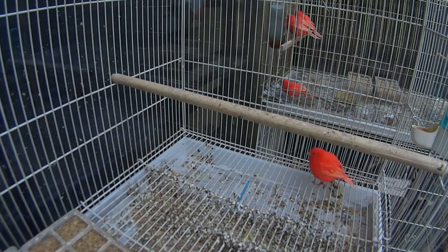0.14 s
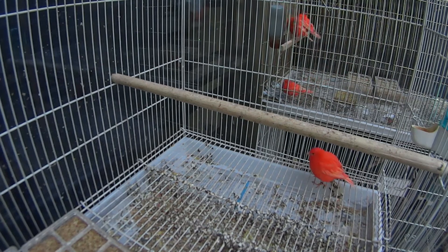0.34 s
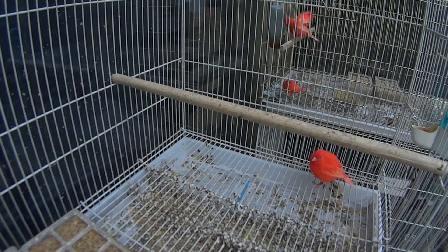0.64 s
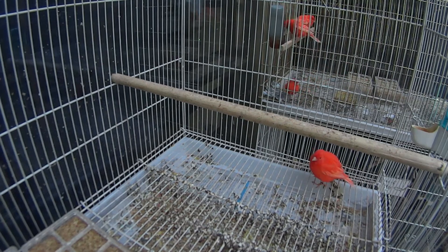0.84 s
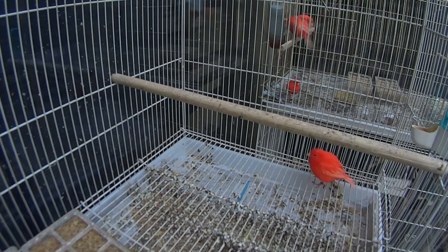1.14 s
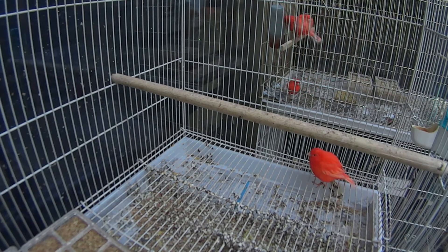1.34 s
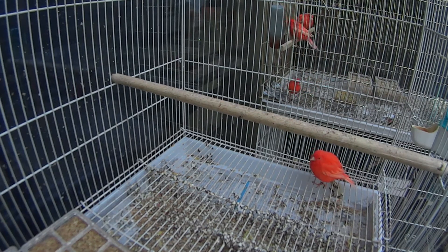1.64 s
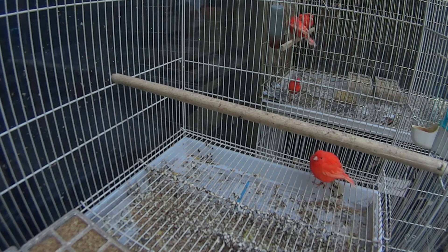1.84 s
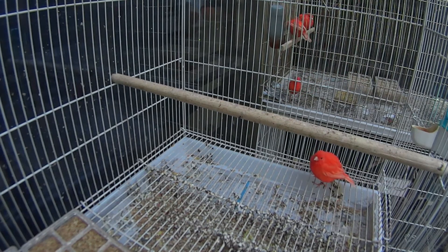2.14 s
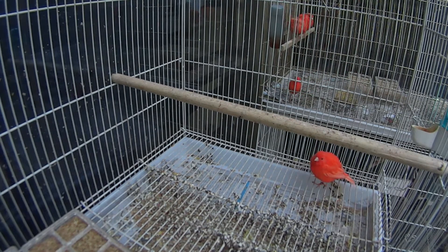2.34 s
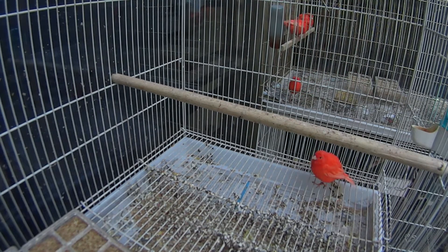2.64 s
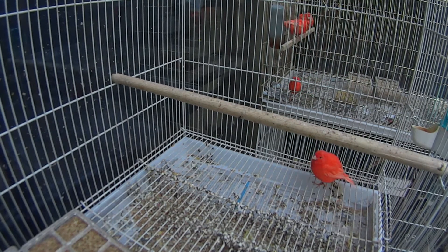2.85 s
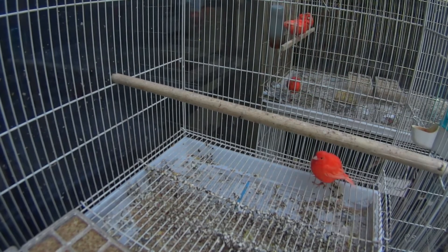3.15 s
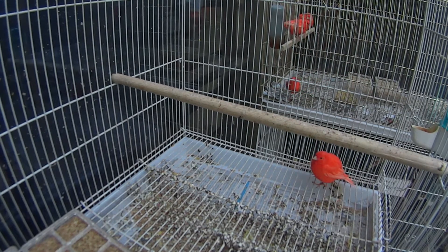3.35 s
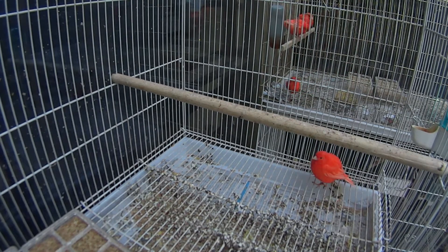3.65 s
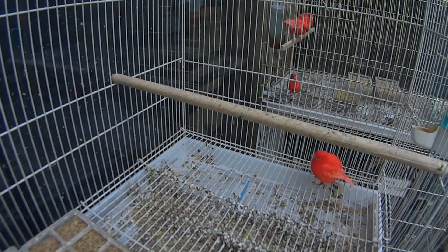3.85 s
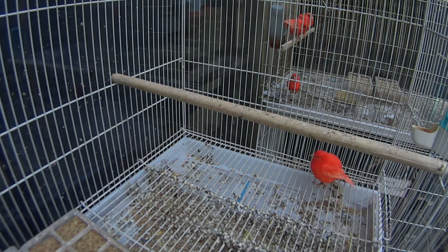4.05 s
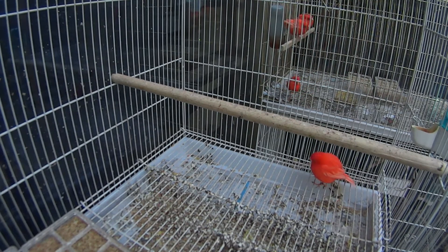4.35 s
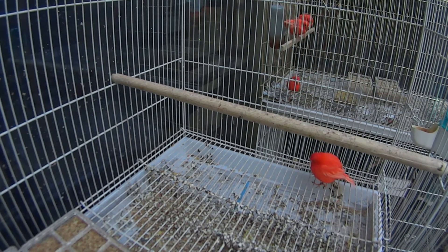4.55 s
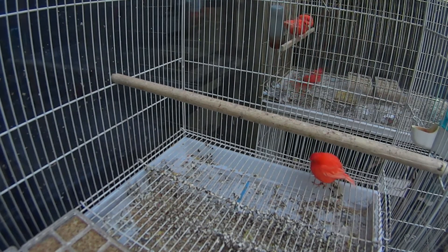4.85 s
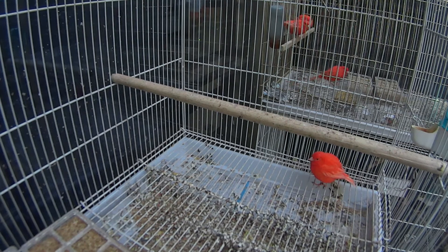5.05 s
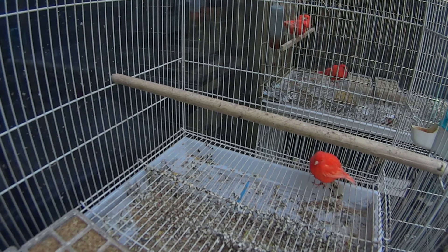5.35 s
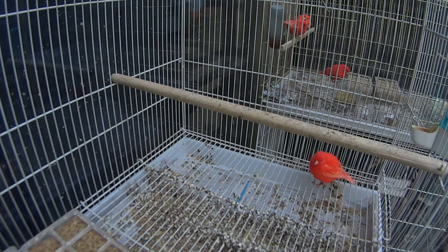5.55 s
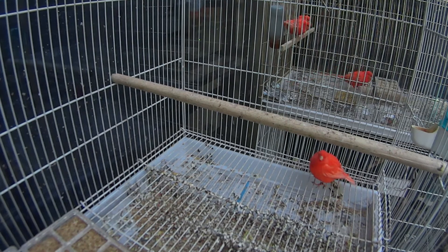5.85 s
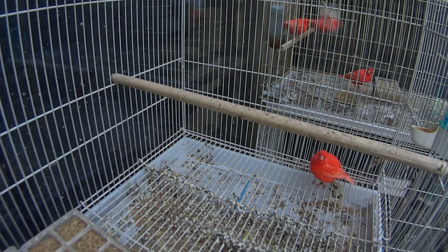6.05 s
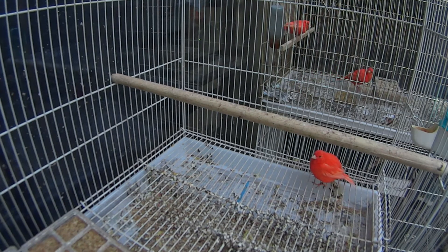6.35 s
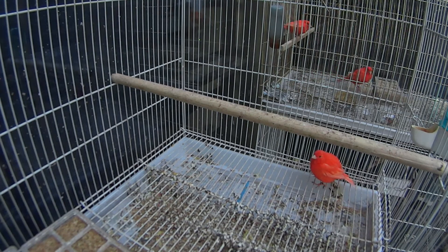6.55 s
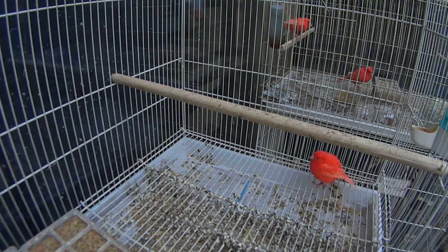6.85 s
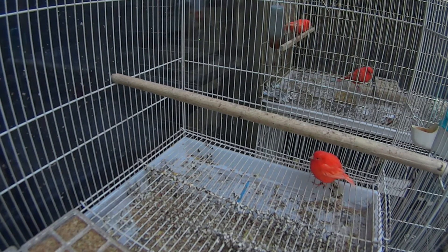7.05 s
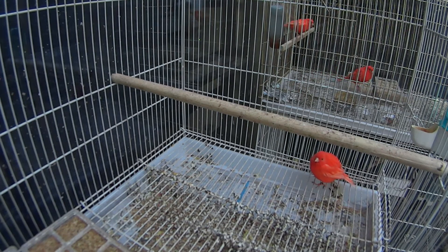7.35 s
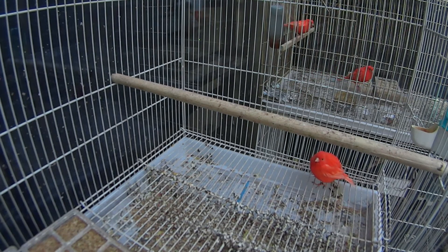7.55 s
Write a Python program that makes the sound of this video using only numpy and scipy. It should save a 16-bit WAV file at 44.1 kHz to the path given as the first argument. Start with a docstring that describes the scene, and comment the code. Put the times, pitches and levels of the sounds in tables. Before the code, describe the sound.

Caged canaries sing rapid rolls, chipping trills and bright falling whistles in a hard-walled room, with light wire ticks, faint wing flutters and low rumble.

```python
"""A hard-walled room with wire cages, where canaries sing. Slurs, peeps and rising calls are gliding sine notes with
overtones; rolls and trills repeat quick sweeps and chips, the rolls heard mostly by way of the walls.
Filtered noise and decaying tones make ticks on the bars, and noise swelling in beats makes wing flutters.
Faint blurred chatter lies behind, over a low rumble and a narrow hum that swell and fade together."""
import sys
import numpy as np
from scipy import signal
from scipy.fft import rfft, irfft
from scipy.io import wavfile
from scipy.ndimage import map_coordinates

SR = 44100
rng = np.random.default_rng(int(sys.argv[2]) if len(sys.argv) > 2 else 0)


def transcribe(signal):
    """Save signal, clipped to [-1, 1], as a 16-bit WAV file at the path in sys.argv[1]."""
    frames = np.atleast_2d(signal).T
    limited = np.clip(frames, -1, 1)
    pcm = np.round(limited * 32767).astype(np.int16)
    wavfile.write(sys.argv[1], SR, pcm)


N = 340011
T = np.arange(N) / SR


def undb(db):
    """Decibels to gain."""
    return 10 ** (np.asarray(db) / 20)


def add(track, s, sound):
    """Mix a sound into a track at time s."""
    i = max(int(s * SR), 0)
    track[i:i + len(sound)] += sound[:max(N - i, 0)]


def over_time(points):
    """Join (seconds, value) points by straight lines over the whole scene."""
    return np.interp(T, *np.transpose(points))


def on_log_axis(hz, points):
    """Read (Hz, value) points at the given frequencies."""
    point_hz, value = np.transpose(points)
    return np.interp(np.log(hz + 1), np.log(point_hz), value)


def noise(points):
    """Noise of rms 1 with a spectrum of (Hz, dB) points."""
    spectrum = rfft(rng.standard_normal(N))
    gain = undb(on_log_axis(np.fft.rfftfreq(N, 1 / SR), points))
    x = irfft(spectrum * gain, N)
    return x / x.std()


def walk(rate, size):
    """Smooth random wander of spread near 1, through `rate` random knots a second."""
    knots = rng.standard_normal(1024)
    return map_coordinates(knots, [np.arange(size) * rate / SR], order=3, mode="wrap")


def syrinx(length, pitches, waver, edge):
    """One note: progress 0-1, the phase of a smooth, slightly unsteady glide, and its soft-edged envelope."""
    u = np.linspace(0, 1, int(length * SR))
    hz = map_coordinates(np.array(pitches, float), [u * (len(pitches) - 1)], order=2, mode="nearest")
    unsteady_hz = hz * (1 + waver * walk(504.7, len(u)))
    phase = 2 * np.pi * np.cumsum(unsteady_hz) / SR
    gate = np.sin(np.pi / 2 * np.clip(np.minimum(u, 1 - u) / edge, 0, 1)) ** 2
    return u, phase, np.sqrt(2) * gate


def rasp(x, db):
    """Quick irregular flutter of the membranes spreads a skirt of noise around each note."""
    return x * (1 + undb(db) * noise([(20, 3.0), (900, 7), (2200, -13), (4000, -13.0), (8000, -71)]))


def phrase(first_s, last_s, count, slowing, db, swell_db, first_hz, last_hz):
    """Syllables as (s, dB, Hz): evenly timed, slowing or quickening, as level and pitch drift through the phrase."""
    scatter_db, scatter_pitch = 1.5, 0.0257  # spread from syllable to syllable: dB, share of pitch
    u = np.linspace(0, 1, count)
    times = first_s + (last_s - first_s) * (u - slowing * u * (1 - u))
    loud, high = rng.standard_normal((count, 2)).T
    levels = db + swell_db * (u - .5) + scatter_db * loud
    pitches = (first_hz + (last_hz - first_hz) * u) * (1 + scatter_pitch * high)
    return zip(times, levels, pitches)


def room(x, direct_db, echo_db, early_db, width):
    """Direct sound, separate slaps from trays and near walls, then a dense tail; the two close ports hear much the same."""
    # Time the tail takes to fall by 60 dB, shorter in the treble. Each row: frequency in Hz, time in seconds.
    t60_points = [(1000, 0.63), (3000, 0.46), (6000, 0.32), (11000, 0.12)]
    slaps_per_s = 500
    t = T[:2 * SR // 3]
    hits = rng.random((len(t))) < slaps_per_s / SR
    slaps = rng.standard_normal((2, len(t))) * hits * np.sqrt(SR / slaps_per_s)
    hz, frame_s, cells = signal.stft(rng.standard_normal((2, len(t))), SR, nperseg=256)
    decay_db = -60 * frame_s / on_log_axis(hz, t60_points)[:, None]
    tail = signal.istft(cells * undb(decay_db), SR)[1][:, :len(t)]
    tail = tail * np.clip(t / 0.0035, 0, 1) + undb(early_db) * slaps * np.exp(-t / 0.029)
    mid, side = tail / np.sqrt(np.sum(tail ** 2, axis=1, keepdims=True))
    responses = np.array([mid + width * side, mid - width * side])
    echoes = signal.fftconvolve(x[None], responses, axes=1)[:, :N]
    return undb(direct_db) * x + undb(echo_db) * echoes


def background():
    """Rumble, hiss and a narrow hum shared by both ports, with opposed noise that makes the room air wide."""
    # Colour of the room noise. Each row: frequency in Hz, level in dB.
    air = [(20, -4), (45, 0.5), (65, 6.5), (95, -6), (140, 3), (200, -5.5), (300, -11.5), (600, -15.5),
           (900, -15.5), (1300, -12), (1800, -25), (3000, -24.5), (6000, -17.5), (11000, -26)]
    # Steady part of the rumble, ahead of its low-pass. Each row: time in seconds, level in dB.
    steady_rumble = [(0, -49), (2, -45), (3.5, -50.5), (4.1, -52), (5.6, -50), (7.7, -49)]
    # Swells of rumble and hum. Each row: time of full swell in seconds, hold in seconds,
    # rumble level in dB (ahead of its low-pass), hum level in dB.
    swell_rows = [(0, 0.019, -43, -61), (1.04, 0.16, -41.5, -59.5), (2.467, 0.045, -39, -53),
                  (4.556, .06, -42.5, -57), (6.172, 0.16, -45, -47), (7.037, 0.47, -46, -58)]
    attack_s, release_s = 0.093, 0.15
    hum_hz, hum_floor_db = 425, -70.5  # the floor is the hum between swells

    rumble_gain, hum_gain = undb(over_time(steady_rumble)), undb(hum_floor_db)
    for s, hold, rumble_db, hum_db in swell_rows:
        attack = np.clip(1 + (T - s) / attack_s, 0, 1)
        swell = attack * np.exp(-np.maximum(T - s - hold, 0) / release_s)
        rumble_gain = np.hypot(rumble_gain, undb(rumble_db) * swell)
        hum_gain = np.hypot(hum_gain, undb(hum_db) * swell)

    low_pass = signal.butter(2, 380, fs=SR, output="sos")
    hiss_high_pass = signal.butter(2, 400, "high", fs=SR, output="sos")
    side_high_pass = signal.butter(2, 330, "high", fs=SR, output="sos")
    rumble = signal.sosfilt(low_pass, noise(air)) * rumble_gain
    hiss = signal.sosfilt(hiss_high_pass, noise(air)) * undb(-49)
    # a slow wander of phase gives the hum its narrow width
    hum = hum_gain * np.sqrt(2) * np.sin(2 * np.pi * hum_hz * T + walk(28, N) / 2)
    side = undb(-48.0) * signal.sosfilt(side_high_pass, noise(air)) + undb(-67.5) * noise(air)
    return rumble + hiss + hum + side * np.array([[1], [-1]])


def chatter(count=1800):
    """Birds at the far end of the room: many faint chips of random pitch and slope that the room blurs together."""
    # Loudness of the chatter. Each row: time in seconds, level in dB ahead of the room.
    loudness = [(0, -37.5), (.3, -36.5), (.45, -45.5), (1.25, -31), (1.6, -46.5), (2.1, -47.5), (2.4, -39),
                (3.1, -48), (3.45, -36.5), (3.9, -51.5), (4.55, -40), (4.8, -72), (5.0, -42.5), (5.75, -37),
                (6.25, -45.5), (7.2, -41), (7.5, -38), (7.71, -45.5)]
    # Which pitches stand out. Each row: chip pitch in Hz, relative level in dB.
    colour = [(1200, -17.5), (1800, -16), (2200, -2), (3000, 6.5), (3700, -8.5), (5300, -5), (6000, -74)]
    out = np.zeros(N)
    for k, (when, height, slope) in enumerate(rng.random((count, 3))):
        hz = 1300 + 4300 * height
        sweep = hz * np.array([.88, 1.12]) ** np.sign(slope - .5)  # either sign of the power: up or down
        u, phase, gate = syrinx(0.0147, sweep, waver=0.022, edge=1.0)
        s = (k + when) / count * N / SR
        add(out, s, undb(on_log_axis(hz, colour)) * gate * np.sin(phase))
    return out / out.std() * undb(over_time(loudness))


def whistler(since, until, waver, edge):
    """One bird's turn of slurs and peeps, with a quick tremble in pitch; its throat damps the overtones."""
    # Short arched peeps. Each row: start in seconds, length in seconds, pitch in Hz,
    # glide from start to end in Hz, level in dB, octave in dB relative to the fundamental.
    peep_rows = [ (0.01, 0.052, 4900, 207, -17.5, -42), (0.395, 0.034, 2650, 552, -30, -28),
                 (0.431, 0.036, 3750, 150, -29.5, -33), (0.489, 0.0226, 3540, 350, -23.5, -23),
                 (0.546, 0.067, 2550, 200, -29.5, -6), (0.749, 0.061, 3443, -48, -23.5, -30),
                 (1.087, 0.064, 3560, -720, -14.5, -9), (5.003, 0.041, 2150, -130, -38.5, 8.5),
                 (5.11, 0.048, 2110, -130, -41, 4), (5.302, 0.031, 3070, 106, -21, -33),
                 (5.377, 0.028, 3234, 120, -17, -34), (5.484, 0.036, 3080, -150, -23, -22),
                 (5.755, 0.018, 2710, -600, -29, 5), (5.832, 0.01, 2620, 48, -26, -10),
                 (6.329, 0.033, 3230, -50, -25.5, -8), (6.387, 0.041, 3540, -230, -23.5, -16),
                 (6.405, 0.016, 4150, -460, -25, -17), (6.931, 0.018, 3170, -100, -22, -24),
                 (7.03, 0.016, 3300, -5, -22.5, -26), (7.358, .07, 2747, -800, -33, -20),
                 (7.417, 0.055, 3000, -450, -30, -13)]
    # Falling slurs. Each row: start in seconds, length in seconds, crest pitch in Hz, pitch it falls towards in Hz,
    # place of the crest from 0 to 1, level halfway in dB, swell from start to end in dB.
    slur_rows = [ (1.183, 0.054, 5510, 3800, 0.24, -11.5, -5), (1.297, 0.055, 6080, 4410, 0, -14.5, 14),
                 (1.405, 0.054, 5370, 4606, 0.12, -16, 12), (1.444, 0.019, 4730, 3390, 0.1, -21.5, -20),
                 (2.467, .06, 5845, 4270, .05, -12.5, 0), (2.602, 0.062, 6460, 4730, 0, -11.5, 5.5),
                 (4.128, 0.0205, 5410, 4440, 0.02, -33.5, 0), (6.491, 0.064, 5510, 3955, 0.02, -27.5, 29.5),
                 (6.639, 0.081, 5845, 4050, 0, -25.5, 22.5), (6.793, 0.074, 5410, 3980, 0.07, -22, 17),
                 (6.945, 0.055, 5300, 4008, 0, -24, 35), (7.085, 0.078, 5420, 4082, 0.03, -25, 27),
                 (7.19, 0.073, 5940, 4360, 0, -23.5, 15), (7.275, 0.071, 5250, 4340, 0, -23.5, 6),
                 (7.345, 0.053, 6380, 3894, 0.13, -23, 18), (7.425, 0.062, 5450, 4400, 0, -26.5, -2),
                 (7.512, .053, 5200, 4274, 0, -18.5, -1), (7.581, 0.066, 5230, 4305, 0, -23, 15),
                 (7.675, .057, 5120, 4820, 0, -22, 27)]
    arches = [row for row in peep_rows if since <= row[0] < until]
    falls = [row for row in slur_rows if since <= row[0] < until]
    throat = signal.butter(2, 7500, fs=SR, output="sos")
    return signal.sosfilt(throat, slurs(falls, waver, edge) + peeps(arches, waver, edge))


def peeps(rows, waver, edge):
    """Short notes that arch slightly along a glide."""
    arch_depth = 0.033  # the arch lowers both ends by this share of the pitch
    out = np.zeros(N)
    for s, length, hz, glide_hz, db, octave_db in rows:
        along = np.linspace(-1, 1, 10)
        pitches = hz * (1 - arch_depth * along ** 2) + glide_hz * along / 2
        u, phase, gate = syrinx(length, pitches, waver, edge)
        tone = np.sin(phase) + undb(octave_db) * np.sin(2 * phase)
        add(out, s, gate * undb(db) * tone)
    return out


def roll():
    """Each syllable is a zigzag: a strong upward sweep, then a drop and a second, softer rise."""
    # Rolls of syllables. Each row: first syllable in seconds, last in seconds, number of syllables,
    # slowing from -1 to 1, level in dB (ahead of the stroke levels), swell in dB,
    # pitch setting of the first syllable in Hz, of the last in Hz.
    roll_rows = [ (0.058, 0.186, 4, 0, -24, 1.5, 2830, 3955), (0.233, .283, 2, 0, -18, -2, 3800, 3920),
                 (0.485, 1.074, 14, .12, -20.5, 1, 3475, 3423),
                 (1.204, 1.35, 4, 0.0042, -20.5, -3.5, 3394, 3205),
                 (4.947, 4.985, 2, 0, -32, 5, 2660, 2640), (5.028, 5.413, 10, 0.0039, -23, 5, 2754, 2984),
                 (5.529, 5.664, 4, 0.005, -17.5, -1.5, 3080, 3493),
                 (5.733, 5.84, 3, 0.0013, -16.5, -9.5, 3000, 3050),
                 (5.872, 6.235, 8, 0, -18.5, -3.5, 3515, 3374)]
    out = np.zeros(N)
    for row in roll_rows:
        for s, db, hz in phrase(*row):
            rise = np.array([0.3994 * hz + 1230, .98 * hz, min(1.27 * hz, 4300)])
            # (lag s, pitches Hz, stroke dB)
            strokes = [(-.003, rise, -6.5), (.014, rise[::-1], -13), (.026, .95 * rise, -12.5)]
            for lag, pitches, stroke_db in strokes:
                u, phase, gate = syrinx(0.012, pitches, waver=0.026, edge=0.19)
                tone = np.sin(phase) + undb(-24) * np.sin(2 * phase)
                add(out, s + lag, undb(db + stroke_db) * gate * tone)
    return rasp(out, db=-26.5)


def cage():
    """A claw or beak strikes the wire: a bright crack and a short ring of the bars."""
    # Knocks and ticks. Each row: time in seconds, crack level in dB (ahead of a 1 dB trim), peak of the ring in dB.
    tick_rows = [(0.061, -47, -67), (.338, -24, -32), (0.616, -59, -42), (.733, -48, -57),
                 (1.148, -38.5, -61), (1.673, -55, -46), (4.923, -47, -76), (4.938, -60, -43),
                 (4.996, -48, -54), (5.756, -48, -64), (5.799, -44, -45)]
    # Ringing modes of the bars. Each row: frequency in Hz, relative level in dB, time to fall 60 dB in seconds.
    bar_modes = [(1380, -6, 0.53), (1244, 11, 0.16), (1413, 20.5, 0.034), (1625, -24, 0.057)]
    out, t = np.zeros(N), T[:SR // 3]
    bright = noise([(1000, -44), (3500, 15), (5000, 18.0), (8500, 22.5), (11000, 7.5)])
    ring = sum(undb(mode_db - 60 * t / t60) * np.sin(2 * np.pi * hz * t) for hz, mode_db, t60 in bar_modes)
    ring = ring / np.abs(ring).max()
    for s, db, ring_db in tick_rows:
        # each tick takes its own stretch of noise
        crack = np.roll(bright, rng.integers(N))[:len(t)] * np.exp(-t / 0.0097)
        add(out, s, undb(db - 1) * crack + undb(ring_db) * ring)
    return out


def slurs(rows, waver, edge):
    """Whistles that tip over a crest, fall and level out; most get louder as they fall."""
    fall_share, octave_db = .45, -28  # width of the fall as a share of the slur; octave below the fundamental
    out = np.zeros(N)
    for s, length, top_hz, end_hz, crest, db, swell_db in rows:
        fall = np.exp(-((np.linspace(0, 1, 20) - crest) / fall_share) ** 2)
        u, phase, gate = syrinx(length, end_hz + (top_hz - end_hz) * fall, waver, edge)
        tone = np.sin(phase) + undb(octave_db) * np.sin(2 * phase)
        add(out, s, gate * undb(db + swell_db * (u - .5)) * tone)
    return out


def trill():
    """Each chip opens with a flick up through a wide range, then lingers and sags; louder ones hold longer."""
    # Trills of chips. Each row: first chip in seconds, last in seconds, number of chips, slowing from -1 to 1,
    # level in dB (ahead of the trims on flick and body), swell in dB, first pitch in Hz, last pitch in Hz,
    # opening flick in dB relative to the chip level.
    trill_rows = [ (1.556, 2.429, 17, 0, -25.5, 5.5, 2746, 2923, -2.5),
                  (2.476, 2.792, 8, 0.0026, -20.5, -3, 3010, 2850, -4.5),
                  (2.834, 2.977, 4, 0.0039, -15.5, 1.5, 2857, 2860, -9),
                  (3.032, 3.197, 4, 0.087, -21, -1, 2767, 2942, -11),
                  (3.254, 3.499, 5, -0.075, -16, 4.5, 3020, 3072, -8.5),
                  (3.773, 3.938, 3, 0.0039, -18.5, -5, 2664, 2616, -24),
                  (4.02, 4.382, 5, 0, -18, 1.5, 2720, 2522, -7.5),
                  (6.497, 6.64, 3, -0.0059, -23.5, 0, 3150, 3010, -28),
                  (7.141, 7.665, 9, -0.00053, -25.5, -0.5, 3107, 2470, -18)]
    out = np.zeros(N)
    for *row, flick_db in trill_rows:
        for s, db, hz in phrase(*row):
            flick = [1700, 2300, 0.95 * hz, 1.005 * hz, 5500]
            u, phase, gate = syrinx(0.0074, flick, waver=0.048, edge=0.3)
            add(out, s, undb(db - 2.5 + flick_db) * gate * np.sin(phase))

            length = np.clip(0.0168 + 0.0003 * (db + 23.5), .008, .03)
            sag = hz * np.array([1.09, 1.02, .99, 0.886])
            u, phase, gate = syrinx(length, sag, waver=0.023, edge=0.14)
            tone = np.sin(phase) + undb(-28.0) * np.sin(2 * phase)
            add(out, s + 0.00199, undb(db - 8) * gate * tone)
    return rasp(out, db=-16.5)


def wings():
    """Feathers brush the air in a short swell of beats."""
    # Flutters. Each row: start in seconds, length in seconds, level at the middle in dB, ahead of the beats.
    flutter_rows = [(2.235, 0.1, -47.5), (2.83, 0.22, -42.5), (4.125, 0.072, -52), (5.367, 0.08, -46),
                    (5.711, 0.083, -38), (7.247, 0.45, -50.5)]
    # Colour of the feather noise. Each row: frequency in Hz, level in dB.
    feather_colour = [(1500, -31.5), (3000, 5), (5000, 11.5), (7000, 1.5), (11000, -12)]
    swell = np.zeros(N)
    for s, length, db in flutter_rows:
        add(swell, s, undb(db) * np.hanning(int(length * SR)))
    beats = undb(3.5 * np.sin(2 * np.pi * 24 * T))  # 24 beats a second, 3.5 dB up and down
    return swell * noise(feather_colour) * beats


def calls():
    """Calls with the beak open rise towards a top pitch: a strong octave joins the fundamental, with weak overtones."""
    # Drawn-out rising calls. Each row: start in seconds, length in seconds, top pitch in Hz, rise time in seconds,
    # fundamental halfway in dB, its swell in dB, octave halfway in dB, its swell in dB.
    call_rows = [ (2.262, 0.093, 2520, .11, -48, 28, -31, 4),
                 (3.527, 0.036, 2310, 0.067, -39.5, 24, -21, 3),
                 (3.565, 0.168, 2886, .05, -18.5, 10.5, -25, -23.5),
                 (4.448, 0.14, 2835, 0.046, -30, -8, -30, -5),
                 (4.466, 0.206, 2157, 0.11, -40.5, 12, -38, -3),
                 (4.542, 0.072, 2804, 0.024, -37, 45, -34, -9),
                 (5.304, 0.062, 2456, 0.022, -56, -3, -29.5, 0),
                 (5.506, 0.096, 2864, 0.052, -33, -5, -26, 2.5), (6.70, 0.23, 2755, .17, -29, 3.5, -29, 0)]
    start_share, sag_hz_per_s = .72, 1346  # starting share of the top pitch; fall of pitch after the rise
    out = np.zeros(N)
    for s, length, top_hz, rise_s, db, swell_db, octave_db, octave_swell_db in call_rows:
        t = np.linspace(0, length, 20)
        rise = np.sin(np.pi / 2 * np.minimum(t / rise_s, 1))
        sag_hz = sag_hz_per_s * np.maximum(t - rise_s, 0)
        pitches = top_hz * (start_share + (1 - start_share) * rise) - sag_hz
        u, phase, gate = syrinx(length, pitches, waver=0.018, edge=0.078)
        low = undb(db + swell_db * (u - .5)) * np.sin(phase)
        upper = np.sin(2 * phase) + undb(-19.0) * np.sin(3 * phase) + undb(-31.5) * np.sin(4 * phase)
        add(out, s, gate * (low + undb(octave_db + octave_swell_db * (u - .5)) * upper))
    return out


def scene():
    """The first slurs come from a near perch, the later ones from further back; the rolls arrive by way of the walls."""
    # How squarely the near bird faces the microphone. Each row: time in seconds, direct sound in dB.
    facing = [(0, -4.5), (1.1, -6), (1.45, -0.5), (2.5, -9.5)]
    second_bird_s = 4
    first = whistler(0, second_bird_s, waver=0.018, edge=0.16)
    second = whistler(second_bird_s, N / SR, waver=0.0308, edge=0.12)
    near = room(rasp(first, db=-22.0), direct_db=over_time(facing), echo_db=-3.5, early_db=7, width=0.32)
    back = room(rasp(second, db=-22), direct_db=-9, echo_db=0.5, early_db=8.5, width=0.37)
    callers = room(rasp(calls(), db=-27.5), direct_db=-4.5, echo_db=-4.5, early_db=1.0, width=0.67)
    rolling = room(roll(), direct_db=-19, echo_db=0.5, early_db=3.5, width=0.6)
    trilling = room(trill(), direct_db=-4, echo_db=-3.5, early_db=-2.0, width=0.78)
    distant = room(chatter(), direct_db=-1, echo_db=-2.5, early_db=0.0, width=0.92)
    stirring = room(cage() + wings(), direct_db=5, echo_db=7.5, early_db=13.0, width=0.47)
    left, right = near + back + callers + rolling + trilling + distant + stirring
    # the birds sit a little to the right, so the left port hears them one sample later
    left = np.append(0, left[:-1])
    return np.array([left, right]) + background()


def record(dry):
    """The recorder rounds the loudest peaks and cuts the top steeply."""
    ceiling, top_hz = 0.47, 11150  # peak limit as a share of full scale; upper edge in Hz
    rounded = ceiling * np.tanh(dry / ceiling)
    return signal.sosfiltfilt(signal.ellip(10, .1, 60, top_hz, fs=SR, output="sos"), rounded)


dry = scene()
out = record(dry)
transcribe(out)
```